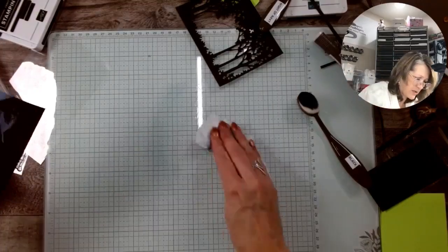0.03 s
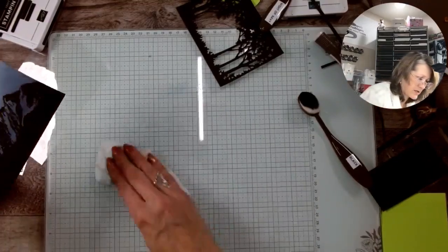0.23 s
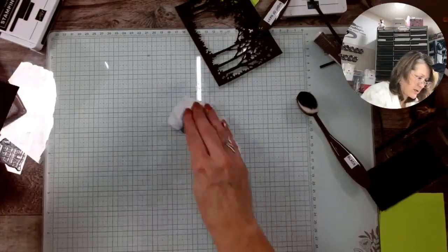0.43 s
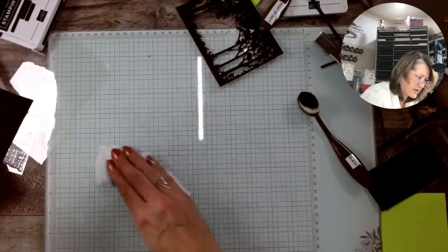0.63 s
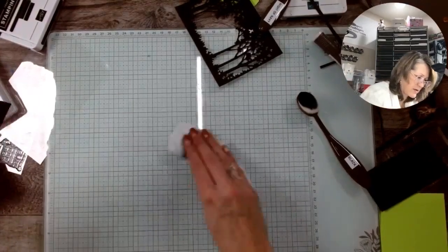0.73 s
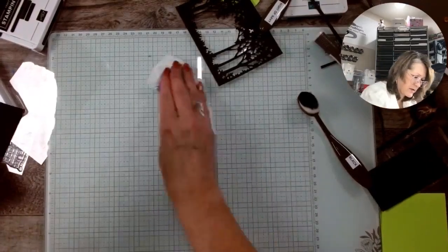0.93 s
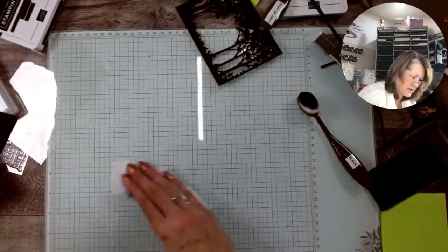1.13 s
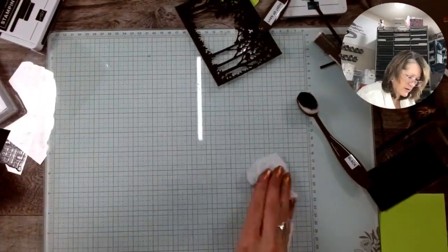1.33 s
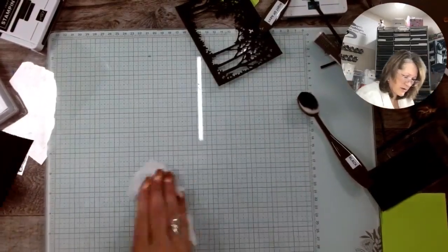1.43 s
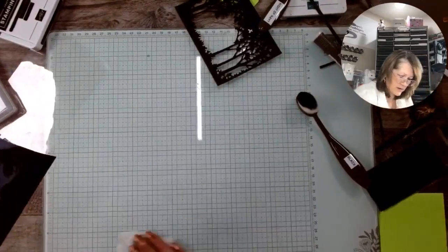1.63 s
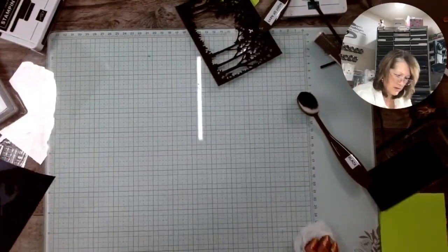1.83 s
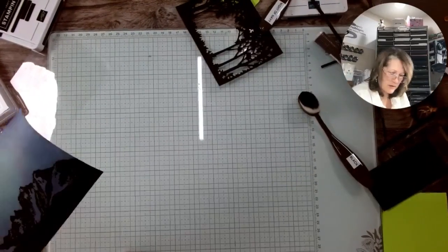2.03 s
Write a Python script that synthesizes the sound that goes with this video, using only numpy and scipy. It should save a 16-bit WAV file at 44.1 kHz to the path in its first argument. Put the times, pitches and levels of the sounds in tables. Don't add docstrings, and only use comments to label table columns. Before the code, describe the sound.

Squeaky scrubbing of wet cloth on glass: dense, loud squeaks at first, then shorter, more separate ones with gaps, low hand thuds on the table, a final knock; small dry room, compact overhead microphone.

```python
import sys
import numpy as np
from scipy import signal
from scipy.fft import rfft, irfft
from scipy.io import wavfile
from scipy.ndimage import uniform_filter1d, map_coordinates

SR = 44100
rng = np.random.default_rng(int(sys.argv[2]) if len(sys.argv) > 2 else 0)


def magnitude_from_level(level_db):
    exponent = np.asarray(level_db, float) / 20
    return 10 ** exponent


def generate_wav(sig):
    pcm = np.round(np.clip(np.atleast_2d(sig).T, -1, 1) * 32767).astype(np.int16)
    wavfile.write(sys.argv[1], SR, pcm)


N = 92610


def unit(x):
    return x / np.sqrt(np.mean(x ** 2) + 1e-20)


def wobble(n, rate):
    knots = rng.standard_normal(256)
    return map_coordinates(knots, [np.arange(n) * rate / SR], mode="wrap")


def coloured(x, spectrum):
    f, db = np.transpose(spectrum)
    hz = np.fft.rfftfreq(N, 1 / SR)
    gain = magnitude_from_level(np.interp(np.log(hz + 1), np.log(f), db))
    return unit(irfft(rfft(x) * gain, N))


# (frequency [Hz], level [dB per Hz])
AIR_SPECTRUM = [(30, -48), (185, -4), (700, -19.5), (3400, -17), (9900, -19.5), (13500, -30)]


def room_air():
    return magnitude_from_level(-64) * coloured(rng.standard_normal(N), AIR_SPECTRUM)


def room(x):
    t60_s, predelay = 0.13, 200
    t = np.arange(SR // 2) / SR
    reflections = uniform_filter1d(rng.standard_normal(len(t)), size=4)
    tail = reflections * magnitude_from_level(-60 * t / t60_s)
    return signal.fftconvolve(np.pad(x, (predelay, 0)), tail / np.linalg.norm(tail))[:N]


# (time [s], level [dB], pitch [Hz], t60 [s])
KNUCKLE_KNOCKS = [
    (.272, -28.5, 293, 0.025),
    (0.3, -27, 370, 0.036),
    (0.333, -39, 163, 0.06),
    (0.442, -38.5, 216, 0.18),
    (.717, -32, 161, 0.051),
    (.987, -46, 184, 0.19),
    (1.976, -23, 217.6, 0.049),
]


def knocks():
    start, db, hz, t60 = np.transpose(KNUCKLE_KNOCKS)[:, :, None]
    t = np.clip(np.arange(N) / SR - start, 0, None)
    onset = 1 - np.exp(-t * hz)
    return np.sum(magnitude_from_level(db - 60 * t / t60) * np.sin(2 * np.pi * hz * t) * onset, axis=0)


def grains(rows, count, spread, cycles, scatter_db):
    out = np.zeros(N + SR)
    draws = rng.standard_normal((len(rows), 3, count, 1))
    for (s, length, db, hz), draw in zip(rows, draws):
        pitch = hz * np.exp(spread * np.tanh(draw[0]))
        t = np.arange(int(6 * cycles / hz * SR)) / SR
        decay = np.exp(-t * pitch / cycles)
        onset = (1 - np.exp(-t * pitch)) ** 2
        rings = np.sin(2 * np.pi * pitch * t) * decay * onset
        start = np.round((s + length * np.tanh(draw[1] / 3)) * SR).astype(int)
        at = np.clip(start, 0, N) + np.arange(len(t))
        size = magnitude_from_level(db + scatter_db * draw[2]) * np.sqrt(4 * length * pitch / cycles / count)
        out += np.bincount(at.ravel(), (size * rings).ravel(), N + SR)
    return out[:N]


# (middle [s], length [s], level [dB], pitch [Hz])
TABLE_THUDS = [(.31, 0.021, -36, 324), (.35, 0.045, -39, 103.6), (.46, 0.057, -38.5, 163),
               (.56, 0.13, -66, 153), (.735, 0.056, -49.5, 86.4), (1.02, 0.11, -59.5, 178),
               (1.14, 0.051, -48, 254), (1.33, 0.074, -54.5, 178), (1.61, 0.081, -50, 195),
               (1.85, 0.061, -45.5, 187), (1.985, 0.022, -35.5, 183), (2.05, .08, -50, 131)]


def thuds():
    return grains(TABLE_THUDS, count=70, spread=0.5, cycles=1.5, scatter_db=3)


def streaks(depth_db):
    z = signal.stft(rng.standard_normal(N), nperseg=256)[2]
    field = uniform_filter1d(rng.standard_normal(z.shape), size=8, axis=1)
    broad = uniform_filter1d(uniform_filter1d(field, size=5, axis=0), size=10, axis=1)
    field = unit(field) + unit(broad)
    return signal.istft(z * magnitude_from_level(depth_db * unit(field)), nperseg=256)[1][:N]


# (frequency [Hz], level [dB per Hz])
CLOTH_SPECTRUM = [(500, -22), (2000, 1.5), (6500, -10), (11000, -24.5), (13000, -82)]


def cloth_hiss(rubbing):
    level_db, drying_db_per_s, follows = -17.5, 8.5, 0.42
    power = np.abs(uniform_filter1d(rubbing ** 2, size=900))
    drying = magnitude_from_level(level_db - drying_db_per_s * np.arange(N) / SR)
    return drying * power ** follows * coloured(streaks(depth_db=1.5), CLOTH_SPECTRUM)


# (middle [s], length [s], level [dB], pitch [Hz])
CHATTER_BURSTS = [(.1, 0.029, -36, 2510), (.17, 0.1, -33, 2000), (.315, .04, -18.5, 1436),
                  (.37, 0.084, -37.5, 1650), (.57, 0.064, -30.5, 1830), (.702, 0.044, -22.5, 1660),
                  (.88, 0.072, -39, 1720), (.995, 0.028, -25.5, 1500), (1.282, 0.022, -19, 1765),
                  (1.258, 0.052, -31, 1600), (1.495, 0.05, -29, 1720), (1.635, 0.077, -57.5, 1900),
                  (1.72, 0.036, -51.5, 4900), (1.752, 0.045, -28, 1596), (1.795, 0.025, -28, 2080),
                  (1.98, 0.032, -38.5, 1820), (2.04, 0.01, -39, 1380), (2.09, 0.011, -52, 3000)]


def chatter():
    return grains(CHATTER_BURSTS, count=110, spread=0.47, cycles=1.005, scatter_db=4)


def squeaks(tables, jitter, flutter_db, fall_db, rate):
    edge_s, dulling_per_s = .006, 0.69
    out = np.zeros(N)
    for rows in tables:
        s, hz, first_db, second_db = np.transpose(rows)
        a, b = round(s[0] * SR), min(round(s[-1] * SR), N)
        t = np.arange(a, b) / SR
        pitch = np.interp(t, s, hz) * (1 + jitter * wobble(b - a, rate))
        phase = 2 * np.pi * np.cumsum(pitch) / SR
        k = np.arange(1, 11)[:, None]
        fall = fall_db * (1 + dulling_per_s * t) * np.log2(k / 2)
        db = np.where(k == 1, np.interp(t, s, first_db), np.interp(t, s, second_db) - fall)
        flutter = np.array([wobble(b - a, rate) ** 2 - 1 for _ in k])
        db = db - flutter_db * k ** 0.6 * flutter
        db = db + flutter_db * np.tanh(wobble(b - a, rate / 2))
        edge = np.sin(np.pi / 2 * np.clip(np.minimum(t - s[0], s[-1] - t) / edge_s, 0, 1))
        treble_loss = 1 + (k * pitch / 8000) ** 4
        partials = magnitude_from_level(db) * np.sin(k * phase + k * k) / treble_loss
        out[a:b] += np.sqrt(2) * edge * np.sum(partials, axis=0)
    return out


# (time [s], slip rate [Hz], first partial [dB], second partial [dB])
ROUGH_SQUEAKS = [
    [(.35, 610, -42.5, -64), (.4, 637, -54.5, -64)],
    [(.525, 908, -52, -52), (.56, 1091, -41.5, -51), (.6, 1095, -41, -60)],
    [(0.172, 978, -43.5, -58), (0.213, 882, -44, -45.5), (0.236, 857, -51, -55)],
    [(1.722, 1522, -37.5, -35), (1.762, 753, -41.5, -56)],
    [(1.735, 1565, -33, -50), (1.79, 2253, -45, -66)],
    [(2.072, 2970, -53, -85), (2.085, 2963, -40.5, -75), (2.1, 3145, -51, -70)],
    [(0.292, 1356, -27, -63), (0.324, 1090, -30.5, -35), (0.35, 1318, -38, -41.5)],
    [(0.665, 1080, -56, -52), (0.697, 942, -29, -32), (0.72, 878, -37, -35)],
    [(0.96, 1218, -44, -68), (0.994, 1465, -27.5, -49.5), (1.025, 1089, -42.5, -34.5)],
    [(1.768, 937, -28, -53), (1.782, 1180, -33, -35), (1.815, 1850, -33.5, -62)],
]


def rough_squeaks():
    return squeaks(ROUGH_SQUEAKS, jitter=0.037, flutter_db=4.0, fall_db=12.5, rate=500)


# (time [s], slip rate [Hz], first partial [dB], second partial [dB])
SLOW_SQUEAKS = [
    [(0.068, 1092, -45, -45), (0.095, 1067, -24, -36), (0.12, 1187, -48, -54)],
    [(.4, 1183, -40.5, -34), (.432, 1121, -38.5, -55)],
    [(.462, 1040, -54, -70), (.52, 1210, -42.5, -71), (.552, 1190, -44, -63)],
    [(.72, 525, -38, -41), (.8, 629, -58, -63)],
    [(.765, 995, -71, -36.5), (.8, 1032, -44, -37.5), (.86, 992.5, -30.5, -38)],
    [(1.185, 730, -55, -55), (1.225, 733, -43.5, -53), (1.247, 391, -43, -52), (1.275, 318, -37.5, -70)],
    [(1.748, 374, -45, -60), (1.782, 348, -49.5, -34.5)],
]


def slow_squeaks():
    return squeaks(SLOW_SQUEAKS, jitter=0.0072, flutter_db=1.5, fall_db=7, rate=160)


# (time [s], slip rate [Hz], first partial [dB], second partial [dB])
CLEAR_EARLY = [
    [(0, 1705, -38, -50), (.03, 1883, -49, -47)],
    [(.025, 1160, -44, -77), (.06, 1130, -52, -77)],
    [(.303, 2454, -29, -60), (.322, 1910, -27, -61)],
    [(.355, 3610, -43, -62), (.4, 3940, -43.5, -64)],
    [(.555, 2060, -30.5, -66), (.575, 2170, -33, -64)],
    [(.568, 4500, -45, -76), (.582, 4660, -42, -94), (.6, 4280, -40, -80)],
    [(.742, 3158, -38, -52), (.762, 3280, -45, -55), (.79, 2983, -39, -53)],
    [(0.258, 3567, -42, -64), (0.3, 3200, -33, -40.5), (0.308, 3150, -31, -67)],
]
CLEAR_MIDDLE = [
    [(0.565, 1730, -34, -49), (0.605, 1640, -33, -41.5), (0.635, 1883, -42, -49.5)],
    [(0.645, 2620, -52, -93), (0.673, 2614, -35, -45), (0.686, 3180, -41, -55)],
    [(.86, 950, -56, -70), (.895, 1266, -57, -70)],
    [(.9, 3360, -55, -81), (.94, 3630, -46.5, -88)],
    [(1.025, 1460, -34, -58), (1.039, 1834, -24.5, -43), (1.062, 2110, -47.5, -91)],
    [(1.122, 1675, -32.5, -73), (1.158, 1792, -41, -47.5), (1.198, 1540, -39.5, -75)],
    [(1.19, 2030, -48, -66), (1.218, 1763, -26.5, -44.5), (1.242, 1465, -44, -55)],
]
CLEAR_END = [
    [(1.39, 2510, -61, -93), (1.413, 2730, -50, -94)],
    [(1.444, 2030, -55, -93), (1.454, 1780, -34.5, -42.5), (1.468, 1492, -22, -35), (1.5, 1180, -46, -53)],
    [(1.52, 1874, -49, -79), (1.542, 1943, -26.5, -59), (1.565, 2270, -53, -100)],
    [(1.517, 4620, -47, -67), (1.533, 4990, -34.5, -61), (1.555, 5080, -62.5, -89)],
    [(1.69, 2252, -46.5, -118), (1.706, 2011, -39, -53), (1.73, 1435, -30, -39)],
    [(1.95, 1598, -49, -110), (1.966, 1421, -35, -50), (1.983, 758, -44.5, -49.5)],
    [(2.028, 1627, -67, -73), (2.042, 1500, -33, -70)],
    [(2.078, 5500, -54, -90), (2.097, 5650, -58, -90)],
]


def clear_squeaks():
    tables = CLEAR_EARLY + CLEAR_MIDDLE + CLEAR_END
    return squeaks(tables, jitter=0.011, flutter_db=2.5, fall_db=14.0, rate=183.0)


# (time [s], slip rate [Hz], first partial [dB], second partial [dB])
LEADING_STROKES = [
    [(.026, 2260, -26, -72), (.036, 2310, -36, -44.5), (.072, 2220, -29.5, -40.5), (.096, 2105, -31, -54.5),
     (.118, 1980, -25, -39.5)],
    [(.116, 2000, -31, -46.5), (.148, 1788, -21, -39), (.175, 1900, -26, -67.5), (.208, 1804, -24.5, -43)],
    [(.205, 1814, -37, -56), (.214, 1785, -19.5, -41), (.232, 1726, -30.5, -48.5), (.256, 1700, -34.5, -50),
     (.266, 1500, -30, -71), (.3, 1600, -43, -61)],
    [(.35, 2012, -31.5, -50), (.378, 2182, -30, -55.5), (.392, 2302, -33, -52), (.418, 2313, -33.5, -49),
     (.446, 2144, -31.5, -41)],
    [(.447, 1686, -36, -47.5), (.466, 1685, -21.5, -47), (.491, 1887, -35.5, -38.5),
     (.53, 2003, -25, -49.5), (.548, 1920, -22, -45), (.562, 1790, -28.5, -60)],
    [(.85, 1684, -34.5, -52), (.872, 1826, -22.5, -37.5), (.898, 2330, -38.5, -58), (.91, 2420, -52.5, -47)],
    [(.932, 2134, -39, -77), (.956, 2159, -30.5, -44.5), (.986, 2023, -27, -53.5), (.996, 1940, -37, -57)],
]


def leading_finger():
    return squeaks(LEADING_STROKES, jitter=0.015, flutter_db=2.5, fall_db=7.5, rate=260)


def scene():
    rubbing = leading_finger() + clear_squeaks() + slow_squeaks() + rough_squeaks() + chatter()
    wipe = rubbing + cloth_hiss(rubbing)
    table = thuds() + knocks()
    return (wipe + magnitude_from_level(-15) * room(wipe) + table + room_air())[None]


def band_limit(x):
    return signal.sosfilt(signal.butter(12, 13380, fs=SR, output="sos"), x)


def record(dry):
    notch_hz, notch_width_hz, low_cut_hz, high_cut_hz = 7990, 1590, 56, 12600
    hz = np.fft.rfftfreq(N, 1 / SR)
    dip = 1 - .8 / (1 + ((hz - notch_hz) / notch_width_hz * 2) ** 2)
    cut = 1 / (1 + (low_cut_hz / (hz + 1)) ** 4) / (1 + (hz / high_cut_hz) ** 12)
    mix = irfft(rfft(dry) * dip * cut, N)
    return band_limit(mix)


dry = scene()
out = record(dry)
generate_wav(out)
```